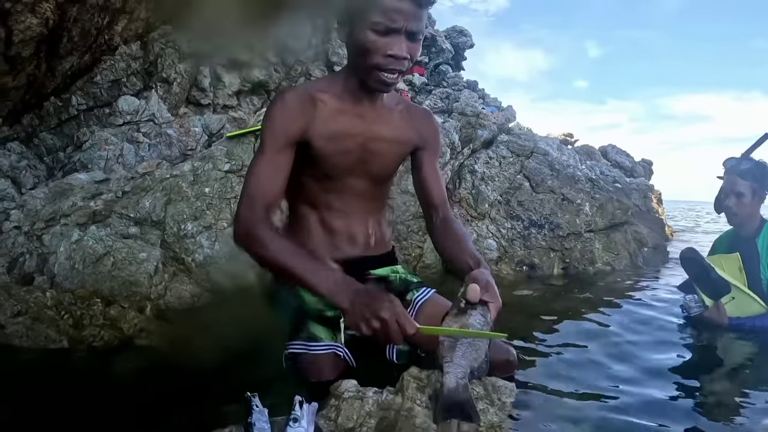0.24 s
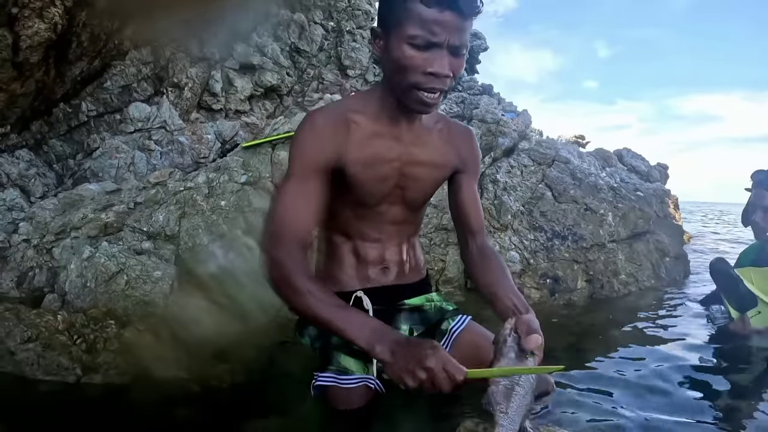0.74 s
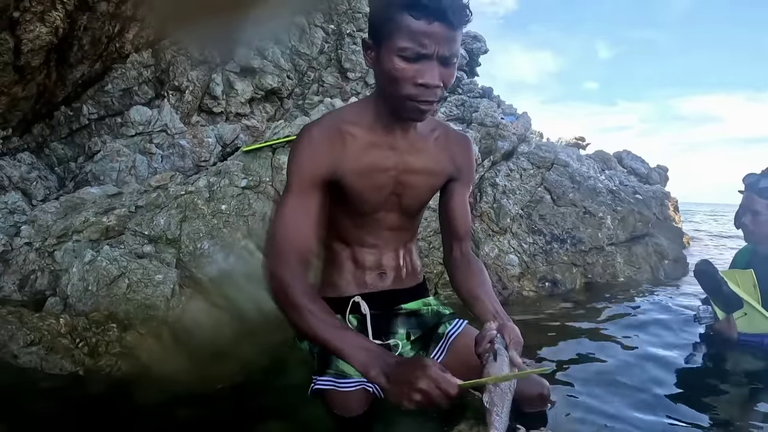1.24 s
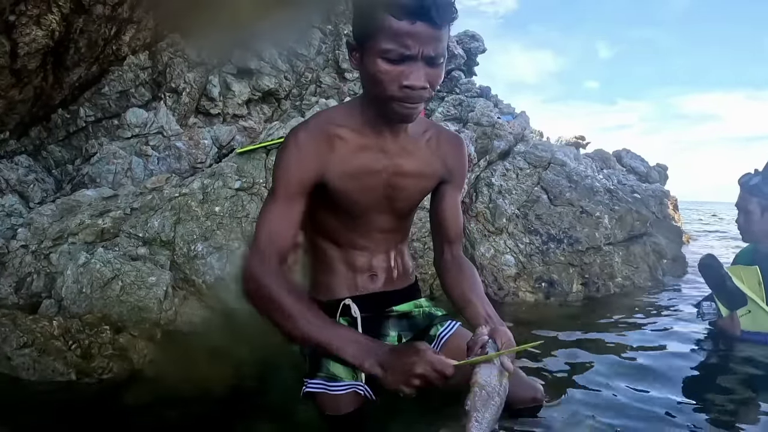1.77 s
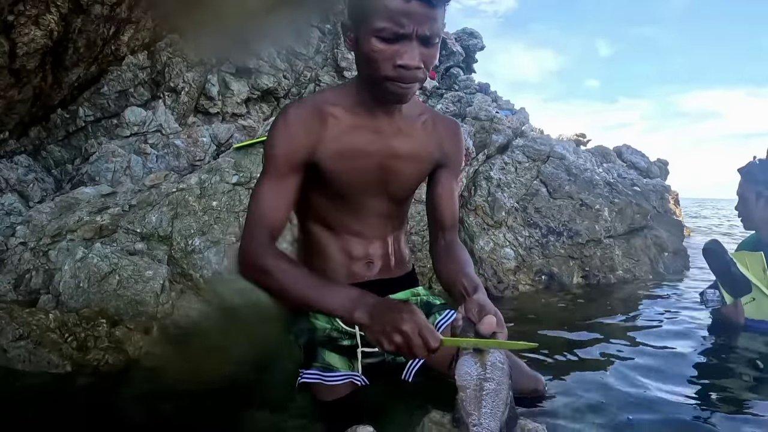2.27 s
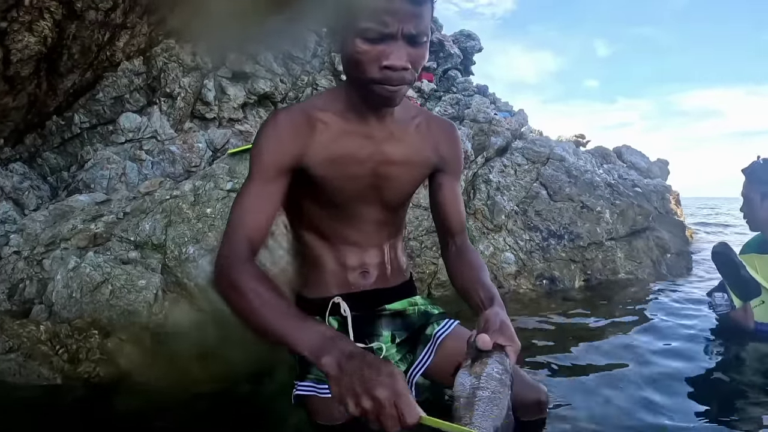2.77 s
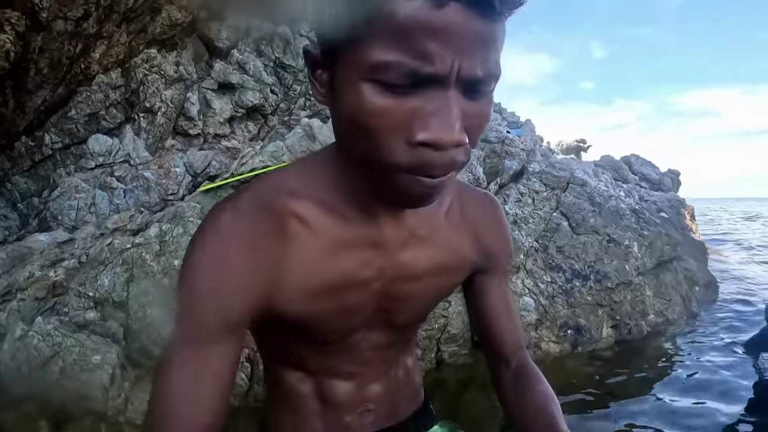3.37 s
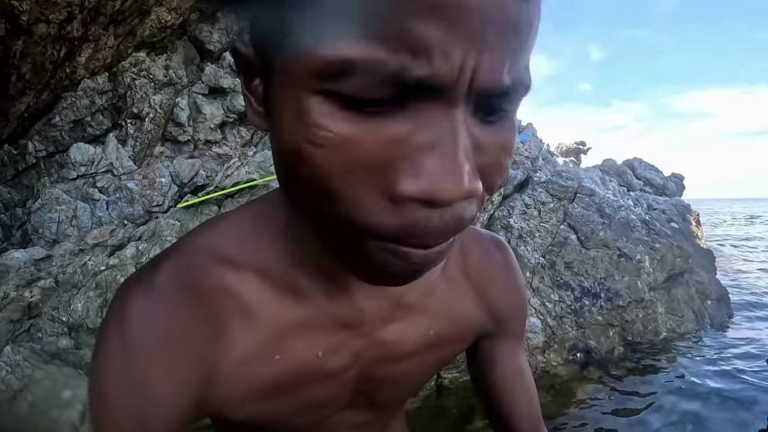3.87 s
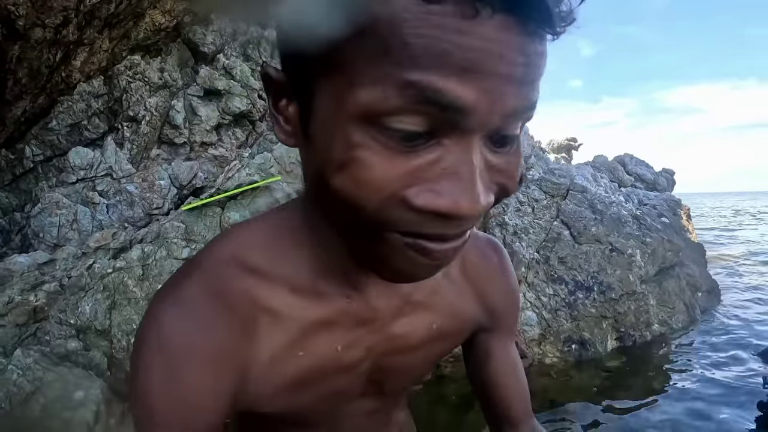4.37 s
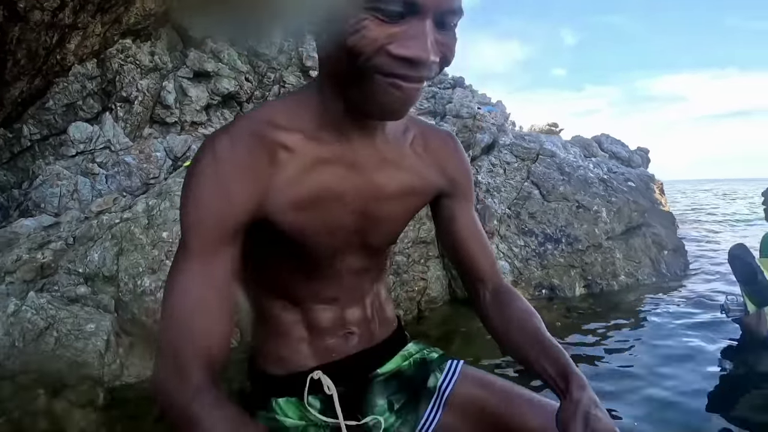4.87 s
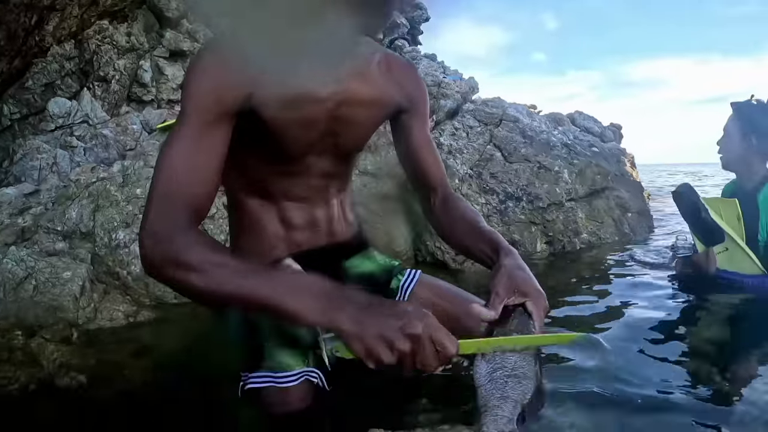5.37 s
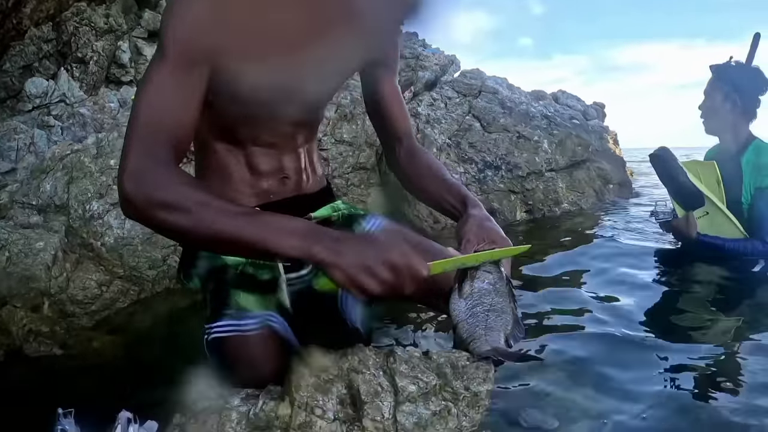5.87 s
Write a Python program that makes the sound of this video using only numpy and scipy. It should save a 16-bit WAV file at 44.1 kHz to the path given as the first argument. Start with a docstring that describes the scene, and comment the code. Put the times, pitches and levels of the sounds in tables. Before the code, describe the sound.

A wet housing is knocked and rubbed close up, air puffs past, then seawater gurgles, bubbles and laps lightly in a rock hollow.

```python
"""A low rumble and the fizz and gurgle of seawater between shore rocks open the scene.
Almost at once a wet, hollow housing is knocked and rubbed, and rings with its resonances; puffs of air follow.
Then come single bubbles, slapping wavelets, one quick wet swipe and clear plinks, over a faint hum.
Water is shaped noise and gliding sines; touch is noise through resonances, plus sines for blows and whines.
The rumble is slow noise that follows drawn level curves."""
import sys
import numpy as np
from scipy import signal
from scipy.fft import rfft, irfft, next_fast_len
from scipy.io import wavfile
from scipy.ndimage import uniform_filter1d, map_coordinates

SR = 44100
rng = np.random.default_rng(int(sys.argv[2]) if len(sys.argv) > 2 else 0)


def to_wav(sig):
    """Store sig (one row per channel, or 1-D mono) as 16-bit WAV at the path in sys.argv[1].

    Samples outside -1..1 are clipped; the rate is SR.
    """
    pcm = np.clip(np.atleast_2d(sig), -1, 1) * 32767
    pcm = np.round(pcm).astype(np.int16)
    wavfile.write(sys.argv[1], SR, pcm.T)  # frames by channels


N = 269493  # length [samples]

# Levels in event tables are set before the mix trims in the functions.
# Half-widths run from the peak to 1/e of its gain; tones are relative and are scaled to rms 1.

# Likeness of left and right, for the sea, the housing and the rumble: (frequency [Hz], likeness [0-1])
SEA_ALIKE = [(60, 0.97), (160, 1), (440, 0.71), (1170, 0.33), (3170, 0.6), (8530, 0.99)]
BODY_ALIKE = [(100, 1), (400, 0.7), (1000, 0.76), (2000, 0.14), (5000, 0.95)]
RUMBLE_ALIKE = [(25, .999), (60, .998), (130, .95), (300, .6)]

# Colour of fizzing and of gurgling water: (frequency [Hz], gain [dB])
FIZZ_TONE = [(500, -12.5), (1200, -17), (1700, -4), (1950, -5.5), (2300, -1.5), (2650, -6), (3100, 4.5),
             (3700, -9.5), (4500, -10.5), (5300, -5), (7200, -10.5), (8200, -24.5), (10000, -31)]
GURGLE_TONE = [(150, -16.5), (400, -21), (750, -24.5), (880, -15.5), (970, 0.5), (1070, -5), (1220, -24),
               (1600, -16.5), (3000, -64)]

# Surges of fizzing water along the rocks: (peak time [s], half-width [s], level [dB])
SURGES = [(.1, 0.71, -56), (1.0, 0.05, -61.5), (1.57, 0.14, -59.5), (2.15, 0.94, -65), (2.66, .06, -62),
          (3.0, 0.32, -55.5), (3.4, 0.31, -61), (3.62, 0.06, -61), (3.9, 0.26, -61.5), (4.14, 0.25, -58.5),
          (4.4, 0.22, -62), (4.73, 0.36, -58.5), (5.08, 0.081, -54.5), (5.36, 0.28, -57.5),
          (5.62, 0.047, -56), (5.95, 0.36, -57.5)]
CALM_FIZZ_DB, CALM_GURGLE_DB = -71, -68.5  # floor between surges
FIZZ_FLICKER_DB = 1.2  # quick random swell and ebb
# Small gliding bubbles: lowest pitch, range, climb as a share of pitch, level
TRICKLE_HZ, TRICKLE_OCTAVES, TRICKLE_CLIMB, TRICKLE_DB = 1266, 0.99, 0.089, -8

# Water swilling in a rock hollow: (peak time [s], half-width [s], level [dB])
GURGLES = [(.05, 0.16, -55), (1.43, 0.045, -62.5), (1.59, 0.09, -57), (1.79, 0.084, -56),
           (2.075, 0.054, -52), (2.32, .025, -57.5), (2.85, 0.05, -54.5), (3.06, 0.19, -53),
           (3.42, 0.034, -70), (3.66, 0.11, -68.5), (3.95, 0.17, -58), (4.11, 0.05, -49),
           (4.23, 0.048, -56), (4.38, 0.067, -54), (4.61, 0.072, -54), (4.77, 0.13, -57.5),
           (4.95, 0.072, -62), (5.13, 0.12, -62.5), (5.3, 0.13, -58.5), (5.51, 0.088, -56),
           (5.71, 0.032, -57), (5.83, 0.2, -58.5), (6.04, 0.058, -56.5)]
# Bubbles in the hollow: lowest pitch, range, climb as a share of pitch
GLIDE_HZ, GLIDE_OCTAVES, GLIDE_CLIMB = 801, 1.098, 0.18
GLIDE_DB, SWILL_DB = -4.5, -2  # the bubbles and the noisy swill around them

# Rumble of handling, then of moving air: (time [s], level [dB])
SWAY = [(0.0, -28.5), (0.34, -14), (0.4, -31.5), (0.75, -40.5), (0.91, -28), (1.0, -28), (1.14, -27.5),
        (1.53, -35.5), (1.81, -31.5), (1.85, -22), (2.32, -31.5), (2.45, -19.5), (2.6, -26)]
DRONE = [(2.55, -26.5), (2.9, -31), (3.36, -16), (3.41, -23), (3.59, -17), (3.66, -29), (3.69, -23),
         (4.24, -31.5), (4.59, -21.5), (4.78, -26.5), (4.95, -20), (5.12, -29), (5.22, -23.5), (6.1, -31)]
# Colour of each rumble: (frequency [Hz], gain [dB])
SWAY_TONE = [(5, -9), (11, 2.5), (18, 1), (28, -9), (45, -21.5), (80, -34), (130, -44.5), (300, -65),
             (700, -120)]
DRONE_TONE = [(10, -6), (24, 1.5), (48, 1), (60, -8.5), (80, -33.5), (110, -38.5), (230, -52), (450, -72),
              (1000, -120)]

# Blows on the housing:
# (time [s], level [dB], ring [Hz], rise [s], t60 [s], crack re level, before trim [dB])
KNOCKS = [(.122, -38, 146, .008, 0.074, -38), (0.2883, -6, 316, 0.00059, 0.016, -8.5),
          (.293, -11.5, 558, 0.00065, 0.052, -26), (.2965, -15, 942, 0.00047, .03, -24),
          (.305, -12.5, 465, 0.00038, 0.027, -15), (.311, -18, 515, 0.00039, 0.03, -21),
          (.321, -20, 2050, 0.00075, 0.024, -17.5), (0.3137, -11.5, 1375, 0.0039, 0.017, -25),
          (0.317, -6.5, 1003, 0.0021, 0.039, -27), (0.325, -12.5, 377, 0.00055, 0.023, -39.5),
          (0.3467, -7, 341, 0.0011, 0.033, -19), (0.357, -20, 1030, 0.001, 0.048, -8.5),
          (0.36, -16, 1632, 0.002, 0.031, -9.5), (.395, -19.5, 1365, 0.003, 0.022, -27),
          (0.41, -21, 1434, .0008, 0.023, -23), (0.475, -28.5, 1690, 0.0021, 0.074, -13),
          (0.502, -23.5, 2046, 0.0012, 0.026, -21), (.512, -25, 1720, 0.0009, 0.0245, -13),
          (.522, -28, 624, .001, 0.03, -13), (0.528, -21.5, 1470, 0.0019, 0.014, -12.5),
          (.551, -27.5, 1420, 0.0012, .02, -18), (.561, -23, 1540, .001, .02, -15),
          (.668, -35, 2250, 0.0015, 0.019, 1.5), (.815, -25, 1020, 0.0017, .04, -23),
          (.85, -23, 944, .001, 0.053, -23), (.879, -16, 1015, 0.00075, 0.029, -16),
          (.889, -15, 324, 0.00044, 0.0064, -30), (.89, -19, 1506, 0.0012, 0.024, -23),
          (.948, -28, 1010, 0.0028, .1, -31), (1.057, -35.5, 1002, .001, .06, -20),
          (1.274, -32, 910, 0.00075, 0.011, -51), (1.276, -25.5, 436, 0.0012, 0.02, -39),
          (2.248, -28.5, 380, 0.00091, .035, -54), (2.515, -26.5, 1056, 0.0054, 0.047, -24),
          (2.578, -27.5, 378, 0.017, 0.067, -15.5), (2.591, -33, 1320, 0.0077, 0.038, -26),
          (3.254, -44.5, 553, 0.0012, 0.019, -27), (3.426, -44.5, 468, .0015, 0.011, -22),
          (4.415, -49, 595, 0.0014, 0.027, -25)]
# Resonances of the housing: (frequency [Hz], width [Hz], gain [dB])
HOUSING = [(382, 93, -0.5), (629, 71, -0.5), (990, 98, 1), (1560, 131, -4), (2084, 56, -8.5),
           (2600, 680, -22), (3670, 240, -23.5), (5340, 970, -29.5), (7110, 2300, -35)]
# The housing favours one side: (frequency [Hz], left minus right [dB])
SHELL_TILT = [(60, 1), (120, 0.5), (250, -0.5), (500, -4), (1020, 1), (2070, 1), (4200, -1.5), (8530, 0)]
# The lower the ring, the heavier the thump (level re the blow)
THUMP_DB, THUMP_DB_PER_OCTAVE, THUMP_REF_HZ = 2, -4, 348
PORT_SKEW = 0.36  # the shell moves the two ports out of step: phase lead and lag [rad]
CLATTER_BRIGHTENS = 0.32  # dB of upper clatter for each dB of crack: soft blows sound dull

# Strokes of skin over the housing: (start [s], length [s], level [dB], hiss re level, before trim [dB])
RUBS = [(0.209, 0.17, -46, -8), (0.373, 0.059, -44, -12), (0.434, 0.035, -38.5, -5), (0.465, 0.4, -34, -9),
        (0.498, .07, -36.5, -11.5), (.812, .02, -39, -17), (0.846, 0.045, -26, -17),
        (0.92, 0.015, -34, -20.5), (0.938, 0.059, -42.5, -21.5), (1.049, 0.092, -41.5, -17.5),
        (1.105, 0.025, -45, -29), (1.153, 0.061, -54.5, -17)]
RUB_ATTACK_S, RUB_T60_S, RUB_SAG_DB_PER_S = 0.019, 0.057, 8.5
FASTEST_AT, SPEED_WIDTH = 0.23, 0.49  # when the skin slides fastest and how broadly, in stroke lengths
HISS_SPEED_DB = 6.5  # extra hiss from slowest to fastest sliding
SOFT_BOOM = 0.44  # dB of extra low ring for each dB less hiss: soft skin booms, firm skin hisses
RUB_ROUGH_DB, RUB_ROUGH_PER_S, RUB_PATCHY_DB = 2.1, 280, 1.8  # stick and slip, its rate, drifts of colour
# Tiny bubbles bursting under the skin: level on the hiss envelope, lowest pitch, range
SQUELCH_DB, SQUELCH_HZ, SQUELCH_OCTAVES = 2.5, 800, 1.6
# The housing under a light touch: (frequency [Hz], width [Hz], gain [dB])
HOLLOW = [(383, 29, 3), (597, 36, -14), (1028, 40, 0.5), (1480, 50, -10)]
HOLLOW_DB, HOLLOW_DAMPING = -29, 0.98  # ring at 0 dB hiss; dB less for each dB more hiss, as firm skin damps it

# The housing sings as skin or air passes:
# (peak time [s], half-width [s], level [dB], pitch at peak [Hz], glide [Hz/s])
WHINES = [(.233, .026, -41.5, 660, 500), (.25, 0.019, -38.5, 987, 700), (0.235, 0.029, -44.5, 1805, 1798),
          (1.125, .022, -33.5, 393, -200), (1.888, 0.032, -32.5, 387.4, 200),
          (1.935, 0.047, -30.5, 572, 252), (1.935, 0.063, -40, 988, -400), (1.97, 0.068, -28.5, 164.3, -29),
          (2.015, .02, -43.5, 975, -1500), (2.538, 0.012, -26.5, 1427, 900), (2.54, 0.011, -33, 2140, 598),
          (2.54, .013, -40, 2900, 600), (2.54, 0.016, -37, 2642, 597)]
WHINE_WAVER_DB = 1.5  # uneven contact

# Squeak of wet skin as it starts to slide; resonances: (frequency [Hz], width [Hz], gain [dB])
SQUEAK_RING = [(675, 87, -8), (1400, 82, -0.5), (1700, 79, -6), (2060, 46, -9)]
SQUEAK_S, SQUEAK_LENGTH_S, SQUEAK_DB = 0.374, 0.08, -32.5

# Puffs of air on the ports: (peak time [s], half-width [s], buffet level [dB], rush level [dB])
PUFFS = [(.82, 0.015, -26.5, -60), (0.897, 0.0099, -18, -44), (1.82, 0.038, -44, -55),
         (1.866, 0.014, -24, -37.5), (1.93, 0.055, -31.5, -29), (2.005, 0.038, -30.5, -46),
         (2.125, 0.024, -42, -55.5), (2.199, 0.058, -36.5, -51), (3.199, 0.14, -37.5, -59)]
# Resonances of the port hollows: (frequency [Hz], width [Hz], gain [dB])
PORT = [(164.6, 17, 1.5), (425, 131, -3.5), (624, 66, -3), (942, 74, -6.5), (1315, 314, -13.5),
        (2540, 395, -21.5), (5530, 9500, -53)]
# Colour of the buffets: (frequency [Hz], gain [dB])
BUFFET_TONE = [(20, -26), (45, 7), (70, -2.5), (100, -13.5), (160, -26), (400, -94)]
BUFFET_WIDTH, FLUTTER_WIDTH = 0.94, 0.94  # shares of the rush's width: slightly shorter than the rush
FLUTTER_LAG_S = 0.016  # the flutter peaks after the rush
FLUTTER_TOWARD_RUSH = 0.77  # flutter level lies this share of the way from buffet to rush, in dB

# Single bubbles: (mid-swell time [s], level [dB], pitch [Hz], climb [share of pitch])
BUBBLES = [(1.02, -37, 2960, 0.093), (2.322, -42, 1060, 0.35), (2.685, -41, 3090, 0.064),
           (2.78, -39, 940, 0.12), (2.815, -41, 958, 0.18), (2.862, -34.5, 1000, 0.3),
           (2.895, -35, 2930, 0.1), (2.98, -41, 1720, .15), (2.995, -29.5, 998, 0.61),
           (3.122, -45, 1250, 0.22), (3.152, -40, 3040, .1), (3.235, -36, 2450, 0.19),
           (3.538, -49, 816, 0.68), (3.56, -36, 970, 0.76), (4.08, -33, 1050, 0.75),
           (4.126, -39.5, 956, 0.53), (4.134, -42, 1900, 0.17), (4.204, -37.5, 2630, .2),
           (4.413, -42, 945, 0.38), (4.442, -32.5, 985, 0.18), (4.577, -35, 934, 0.23),
           (4.655, -53, 776, 0.38), (4.695, -45, 1130, 0.19), (4.81, -38.5, 2600, .2),
           (5.148, -27, 2950, 0.07), (5.162, -40.5, 1380, 0.21), (5.25, -39, 2780, .1),
           (5.392, -31, 5650, 0.17), (5.422, -42, 1070, 0.14), (5.504, -36.5, 1007, 0.17),
           (5.541, -45, 1160, .25), (5.68, -38.5, 1013, 0.097), (6.059, -41.5, 933, 0.16)]
BUBBLE_RISE_CYCLES = 10.97  # a bubble swells for this many cycles before its peak
BUBBLE_FLUTTER_DB = 1.6  # moving water makes the ring uneven

# Thin sheets of water hissing off the rock: (peak time [s], half-width [s], level [dB])
DRAINS = [(1.109, 0.066, -56), (1.46, 0.022, -63.5), (2.979, 0.015, -69), (3.1, 0.065, -60),
          (3.86, 0.031, -60), (4.1, 0.015, -63), (4.36, 0.036, -57.5), (4.61, 0.015, -52.5),
          (5.382, 0.033, -62), (5.9, 0.021, -54.5)]
# Wavelets slapping the rock:
# (time [s], level [dB], t60 [s], trapped air pitch [Hz], ring re level [dB], low plop re level [dB])
SLAPS = [(1.5566, -32, 0.18, 3150, -5.5, -28), (2.442, -37.5, 0.061, 2190, -9, -35),
         (3.338, -25.5, 0.092, 1580, -8.5, -15), (3.7189, -36, 0.17, 1630, -2.5, -38.5),
         (4.065, -35.5, 0.22, 2220, -14, -19), (4.869, -28.5, 0.078, 1670, -9, -18),
         (5.1462, -32, 0.036, 3040, -8, -18.5), (5.3017, -36.5, 0.21, 2320, -5, -20),
         (5.336, -29.5, 0.085, 2360, -6.5, -26), (5.366, -43.5, 0.044, 2330, 3, -32),
         (5.611, -36, 0.12, 2370, -5.5, -33), (5.947, -32.5, 0.082, 2030, -6.5, -40)]
# Colour of the slaps and of their spray: (frequency [Hz], gain [dB])
SLAP_TONE = [(200, -13.5), (700, -20.5), (1000, 11), (1350, -10.5), (1700, 5), (2400, 1.5), (3100, 6),
             (3900, -17), (6000, -25.5)]
SPRAY_TONE = [(2000, -20.5), (4000, -5.5), (5200, 5), (7200, 0.5), (8500, -30.5), (11000, -36)]
SLAP_RISE_S, SLAP_RING_CYCLES = 0.0045, 39  # attack; life of the trapped air's ring
SLAP_TICK_DB, SLAP_SPRAY_DB = -22, -20  # first contact and spray re the burst, before trims

# Resonances in the swipe: (frequency [Hz], width [Hz], gain [dB])
SWIPE_RING = [(399, 92, -2.5), (1010, 79, 1.5), (1226, 104, -1), (1424, 68, 2.5), (1673, 63, 1),
              (2147, 53, 2), (2600, 43, -1), (2900, 160, -7), (5200, 1470, -19.5), (6720, 1040, -20)]
SWIPE_S, SWIPE_WIDTH_S, SWIPE_DB = 2.538, 0.014, -24  # peak time, half-width, level
GRAZE_WIDER, GRAZE_DB = 3.46, -16.5  # lighter touch around the swipe: width and level against it

# Air pockets snapped shut by a slap: (time [s], level [dB], pitch [Hz], t60 [s])
PLINKS = [(3.341, -37, 1060, 0.052), (3.342, -42, 2277, 0.039), (3.345, -40.5, 2867, 0.045),
          (4.868, -38, 977, 0.053), (4.87, -39, 4800, 0.032), (4.869, -46, 4210, 0.06),
          (4.869, -42, 2930, 0.053), (5.338, -39.5, 3000, .05), (5.338, -49, 5020, .05),
          (5.613, -45.5, 2240, .06), (5.632, -42.5, 2390, 0.049), (5.948, -51, 4650, .04)]
PLINK_RISE_S, PLINK_CLIMB = 0.0025, 0.02  # attack; climb as a share of pitch

# Narrow hum resonances, applied twice: (frequency [Hz], width [Hz], gain [dB])
HUM_LINES = [(118, 20, -5), (168.3, 8.9, -2), (232.6, 5.4, -0.5), (290, 36, -6.5)]
HUM_PEAK_S, HUM_DB, HUM_FADE_DB_PER_S = 4.35, -63, 7.5

TOP_HZ = 9130  # corner of the final low-pass


def amp(db):
    """Decibels to gain."""
    return 10 ** (np.asarray(db) / 20)


def unit(x):
    """Scale to rms 1."""
    return x / np.sqrt(np.mean(x ** 2) + 1e-20)


def noise_pair():
    """Two unrelated channels of white noise."""
    return rng.standard_normal((2, N))


def along(points, hz):
    """(frequency, value) points read on a log frequency axis."""
    f, value = np.transpose(points)
    return np.interp(np.log(hz + 1), np.log(f + 1), value)


def gains(rows, fade):
    """Gain per sample along (time, level) rows, fading out beyond them."""
    s, db = np.transpose(rows)
    t = np.arange(N) / SR
    edges = np.interp(t, [s[0] - fade, s[0], s[-1], s[-1] + fade], [0, 1, 1, 0])
    return edges * amp(np.interp(t, s, db))


def wobble(rate):
    """A smooth random curve, rate knots a second."""
    knots = rng.standard_normal(int(N * rate / SR) + 4)
    return map_coordinates(knots, [np.arange(N) * rate / SR])


def filtered(x, response):
    """x times a response of frequency."""
    size = next_fast_len(N + SR // 2)
    spectrum = rfft(x, size) * response(np.fft.rfftfreq(size, 1 / SR))
    return irfft(spectrum, size)[..., :N]


def coloured(x, tone):
    """x filtered by a tone table, at rms 1."""
    return unit(filtered(x, lambda hz: amp(along(tone, hz))))


def resonate(x, modes):
    """x through parallel resonances of alternating sign."""
    def response(f):
        total = 0
        for k, (centre, width, db) in enumerate(modes):
            damping = 1j * f * width
            total = total + (-1) ** k * amp(db) * damping / (centre * centre - f * f + damping)
        return total
    return filtered(x, response)


def band(x, lo_hz, hi_hz, order=10):
    """One band of x, at rms 1."""
    def response(f):
        low_edge = 1 + (lo_hz / (f + 1)) ** order
        high_edge = 1 + (f / hi_hz) ** order
        return 1 / np.sqrt(low_edge * high_edge)
    return unit(filtered(x, response))


def spread(pair, alike):
    """Two unrelated signals become left and right with the given likeness."""
    def response(hz):
        turn = np.arccos(np.clip(along(alike, hz), -1, 1)) / 2
        return np.array([np.cos(turn), np.sin(turn)])
    mid, side = filtered(pair, response)
    return np.array([mid + side, mid - side])


def grit(rate, scatter_db, smooth):
    """Two channels of tiny random impulses over a share of smooth noise."""
    hits = rng.random((2, N)) < rate / SR
    sizes = rng.choice([-1, 1], (2, N)) * amp(scatter_db * np.minimum(noise_pair(), 2))
    return unit(hits * sizes) + smooth * noise_pair()


def patchy(x, depth_db):
    """Drifting patches of random gain over time and pitch."""
    z = signal.stft(x, nperseg=512)[2]
    field = rng.standard_normal(z.shape[1:])
    for axis in (0, 1):
        field = uniform_filter1d(field, size=5, axis=axis)
    return signal.istft(z * amp(depth_db * unit(field)), nperseg=512)[1][:, :N]


def add(track, s, sound):
    """Mix a sound into a track at time s, or at the start if s is negative."""
    start = max(round(s * SR), 0)
    room = track[..., start:start + sound.shape[-1]]
    room += sound[..., :room.shape[-1]]


def swell(t, rise, t60):
    """A rounded rise to 1, then an exponential decay."""
    attack = np.sin(np.pi / 2 * np.minimum(t / rise, 1)) ** 2
    return attack * amp(-60 * np.maximum(t - rise, 0) / t60)


def bell(s, width):
    """A smooth rise to 1 at time s and an equal fall."""
    return np.exp(-((np.arange(N) / SR - s) / width) ** 2)


def stroke(s, length):
    """Pressure of one stroke: attack, a slowly sagging hold, release."""
    t = np.maximum(np.arange(N) / SR - s, 0)
    release_db = 60 * np.maximum(t - length, 0) / RUB_T60_S
    return np.minimum(t / RUB_ATTACK_S, 1) * amp(-RUB_SAG_DB_PER_S * t - release_db)


def bubble(hz, cycles, climb, rise):
    """A bubble rings for some cycles and climbs in pitch as it nears the surface."""
    t = np.arange(SR // 12) / SR
    life = cycles / hz
    bent_time = t + climb * t * (t / life / 2 - 1 / 4)
    return swell(t, rise, life) * np.sin(2 * np.pi * hz * bent_time)


def bubbling(count, low_hz, octaves, cycles, climb, rise, range_db):
    """A stereo stream of bubbles at random moments, pitches and places, at rms 1."""
    out = np.zeros((2, N))
    for when, pitch, size, place in rng.random(size=(count, 4)):
        ring = bubble(low_hz * 2 ** (octaves * pitch), cycles, climb, rise)
        pan = amp(np.array([4, -4]) * (place - 0.5))
        add(out, when * N / SR, np.outer(pan, ring) * amp(-range_db * size))
    return unit(out)


def surging(rows, calm_db):
    """Gain of water that swells at each row and calms between them; powers add."""
    power = sum((amp(db) * bell(s, width)) ** 2 for s, width, db in rows)
    return np.sqrt(amp(calm_db) ** 2 + power)


def wash():
    """The open sea keeps up a faint wash behind the rocks; it wanders in level."""
    sea = spread(noise_pair(), SEA_ALIKE) * amp(1.5 * wobble(9))
    return amp(-68) * coloured(sea, FIZZ_TONE) + amp(-76) * coloured(sea, GURGLE_TONE)


def lapping():
    """Small bubbles fizz, trickle and burst along the water's edge."""
    foam = spread(grit(rate=800, scatter_db=5.5, smooth=0.95), SEA_ALIKE)
    foam = patchy(foam * amp(3.1 * wobble(58)), depth_db=4)
    beads = bubbling(count=3000, low_hz=1448, octaves=2.5, cycles=32, climb=0.055, rise=0.001, range_db=25.5)
    spray = unit(coloured(foam, FIZZ_TONE) + amp(-8) * coloured(beads, FIZZ_TONE))
    spray = spray * amp(FIZZ_FLICKER_DB * wobble(10))
    trickle = bubbling(count=760, low_hz=TRICKLE_HZ, octaves=TRICKLE_OCTAVES, cycles=54,
                       climb=TRICKLE_CLIMB, rise=0.0051, range_db=20)
    return surging(SURGES, CALM_FIZZ_DB) * (amp(1.07) * spray + amp(TRICKLE_DB) * trickle)


def gurgling():
    """Water swills in a rock hollow; overlapping bubbles glide up through its resonance."""
    swill = patchy(spread(grit(rate=200, scatter_db=5.5, smooth=0.41), SEA_ALIKE), depth_db=2)
    glides = bubbling(count=420, low_hz=GLIDE_HZ, octaves=GLIDE_OCTAVES, cycles=48,
                      climb=GLIDE_CLIMB, rise=0.008, range_db=10)
    glides = unit(coloured(glides, GURGLE_TONE) + amp(-19) * glides)
    water = amp(SWILL_DB) * coloured(swill, GURGLE_TONE) + amp(GLIDE_DB) * glides
    return surging(GURGLES, CALM_GURGLE_DB) * water


def rumble():
    """Slow pressure swings of handling and moving air, nearly the same in both channels."""
    out = np.zeros((2, N))
    for rows, tone in ((SWAY, SWAY_TONE), (DRONE, DRONE_TONE)):
        swing = coloured(spread(noise_pair(), RUMBLE_ALIKE), tone)
        # Divide by the local rms so that the level curve alone shapes the loudness
        power = uniform_filter1d(uniform_filter1d(swing[0] ** 2, size=5000), size=3000)
        level = uniform_filter1d(gains(rows, fade=0.19), size=1300)
        out += level * swing / np.sqrt(np.abs(power))
    return out


def knocks():
    """Each blow rings one resonance of the housing, with a wet crack, a clatter of the shell and a low thump."""
    t = np.arange(SR // 5) / SR
    rings = np.zeros((2, N))
    cracks, clatter, bright = np.zeros((3, N))
    skew = PORT_SKEW * np.array([[1], [-1]])
    for s, db, hz, rise, t60, crack_db in KNOCKS:
        thump_db = THUMP_DB + THUMP_DB_PER_OCTAVE * np.log2(hz / THUMP_REF_HZ)
        blow = amp(db) * swell(t, rise, t60)
        thump = amp(db + thump_db) * swell(t, 0.0041, 0.029) * np.sin(2 * np.pi * 75 * t)
        add(rings, s, -blow * np.sin(2 * np.pi * hz * t + skew) - thump)
        add(cracks, s, amp(db + crack_db) * swell(t, rise, 0.017))
        add(clatter, s, blow)
        add(bright, s, blow * amp(CLATTER_BRIGHTENS * crack_db))
    noise = spread(noise_pair(), BODY_ALIKE)
    shell = unit(resonate(spread(noise_pair(), BODY_ALIKE), HOUSING))
    crack_noise = amp(-7.5) * cracks * band(noise, 918, 6480)
    low_clatter = amp(-14) * clatter * band(shell, 180, 750)
    high_clatter = amp(-6.5) * bright * band(shell, 990, 3600)
    return rings + crack_noise + low_clatter + high_clatter


def rubs():
    """Skin slips in tiny catches that excite the wet housing; it hisses most where it slides fastest."""
    press, boom, hiss, hollow = np.zeros((4, N))
    for s, length, db, hiss_db in RUBS:
        pressure = amp(db) * stroke(s, length)
        speed = bell(s + FASTEST_AT * length, SPEED_WIDTH * length)
        press += pressure
        hollow += pressure * amp(min(HOLLOW_DB - HOLLOW_DAMPING * hiss_db, 2))
        boom += pressure * amp(-SOFT_BOOM * hiss_db)
        hiss += pressure * amp(hiss_db - HISS_SPEED_DB * (1.5 - speed))
    catches = grit(rate=1700, scatter_db=0, smooth=0.7) * amp(RUB_ROUGH_DB * wobble(RUB_ROUGH_PER_S))
    slips = spread(patchy(catches, depth_db=RUB_PATCHY_DB), BODY_ALIKE)
    shell = resonate(slips, HOUSING)
    squelch = bubbling(count=900, low_hz=SQUELCH_HZ, octaves=SQUELCH_OCTAVES, cycles=18,
                       climb=0.05, rise=0.0002, range_db=26)
    low = amp(-10) * band(shell, 170, 900) + amp(-16.5) * band(shell, 60, 109)
    middle = amp(-1.5) * band(shell, 800, 1480)
    high = amp(7) * band(shell, 1920, 8900) + amp(SQUELCH_DB) * squelch
    ring = band(resonate(slips, HOLLOW), 300, 1700)
    return boom * low + press * middle + hiss * high + hollow * ring


def whines():
    """Single resonances of the housing swell into short gliding tones."""
    out = np.zeros(N)
    for s, width, db, hz, glide in WHINES:
        t = np.arange(N) / SR - s
        turns = hz * t + glide * t ** 2 / 2 + rng.random()
        out += amp(db) * bell(s, width) * np.sin(2 * np.pi * turns)
    return out * amp(WHINE_WAVER_DB * wobble(120))


def squeak():
    """Wet skin catches on the housing with a thin, grainy squeak."""
    catches = spread(grit(rate=900, scatter_db=-1, smooth=0.54), BODY_ALIKE)
    return amp(SQUEAK_DB) * stroke(SQUEAK_S, SQUEAK_LENGTH_S) * unit(resonate(catches, SQUEAK_RING))


def puffs():
    """Air buffets the microphone ports, flutters in them and sounds their hollows."""
    buffet, flutter, rush = np.zeros((3, N))
    for s, width, buffet_db, rush_db in PUFFS:
        flutter_db = buffet_db + FLUTTER_TOWARD_RUSH * (rush_db - buffet_db)
        buffet += amp(buffet_db) * bell(s, BUFFET_WIDTH * width)
        flutter += amp(flutter_db) * bell(s + FLUTTER_LAG_S, FLUTTER_WIDTH * width)
        rush += amp(rush_db) * bell(s, width)
    eddies = spread(noise_pair() * amp(2.55 * wobble(110)), BODY_ALIKE)
    port = resonate(eddies, PORT)
    push = amp(1) * buffet * coloured(eddies, BUFFET_TONE)
    return push + amp(-3) * flutter * band(port, 105, 215) + amp(2.5) * rush * band(port, 333, 7500)


def bubbles():
    """Larger bubbles swell as their pitch climbs; two quieter ones ring near each in time and pitch."""
    out = np.zeros(N)
    for s, db, hz, climb in BUBBLES:
        rise = BUBBLE_RISE_CYCLES / hz
        add(out, s - rise / 2, amp(db - 7.5) * bubble(hz, cycles=43, climb=climb, rise=rise))
        for delay, pitch in rng.standard_normal((2, 2)):
            small = bubble(hz * np.exp(0.08 * pitch), cycles=39, climb=climb, rise=0.0046)
            add(out, s + 0.023 * delay, amp(db - 17) * small)
    return out * amp(BUBBLE_FLUTTER_DB * wobble(160))


def slaps():
    """Wavelets hit the rock with a tick, a burst and a low plop; trapped air rings, and spray and drains hiss."""
    t = np.arange(SR // 4) / SR
    body, plop, pockets = np.zeros((3, N))
    mist = sum(amp(db) * bell(s, width) for s, width, db in DRAINS)
    for s, db, t60, hz, ring_db, plop_db in SLAPS:
        tick = amp(SLAP_TICK_DB) * swell(t, 0.0004, 0.009)
        burst = amp(db) * (swell(t, SLAP_RISE_S, t60) + tick)
        add(body, s, burst)
        add(mist, s, burst * amp(SLAP_SPRAY_DB))
        add(plop, s, burst * amp(plop_db))
        pocket = bubble(hz, cycles=SLAP_RING_CYCLES, climb=0.05, rise=0.0011)
        add(pockets, s, amp(db + ring_db) * pocket)
        for delay, pitch in rng.random(size=(5, 2)):
            small_hz = hz * 2 ** (1.3 * pitch - 0.2)
            small = bubble(small_hz, cycles=SLAP_RING_CYCLES, climb=0.089, rise=0.00031)
            add(pockets, s + 0.011 * delay, amp(db + ring_db - 7.5) * small)
    drops = spread(grit(rate=2600, scatter_db=4, smooth=0.16), SEA_ALIKE)
    splash = amp(-14) * body * coloured(drops, SLAP_TONE)
    spray = mist * coloured(drops, SPRAY_TONE)
    return pockets + splash + spray + amp(-7) * plop * band(drops, 170, 700)


def swipe():
    """A finger squeezes a film of water off the housing in one bright rasp."""
    rasp = spread(grit(rate=2200, scatter_db=-1, smooth=0.88), BODY_ALIKE)
    graze = amp(GRAZE_DB) * bell(SWIPE_S, GRAZE_WIDER * SWIPE_WIDTH_S)
    pressure = bell(SWIPE_S, SWIPE_WIDTH_S) + graze
    return amp(SWIPE_DB) * pressure * unit(resonate(rasp, SWIPE_RING))


def plinks():
    """Pockets of air pinched off against the rock ring quickly and clearly."""
    out = np.zeros(N)
    for s, db, hz, t60 in PLINKS:
        add(out, s, amp(db) * bubble(hz, cycles=hz * t60, climb=PLINK_CLIMB, rise=PLINK_RISE_S))
    return out


def hum():
    """Narrow low lines of resonant noise waver under the water, rising to one peak and fading again."""
    distance = np.abs(np.arange(N) / SR - HUM_PEAK_S)
    lines = resonate(resonate(rng.standard_normal(N), HUM_LINES), HUM_LINES)
    return amp(HUM_DB - HUM_FADE_DB_PER_S * distance) * unit(lines)


def scene():
    """The sea all around, the handling noises right at the microphone."""
    sea = wash() + lapping() + gurgling() + bubbles() + slaps() + plinks()
    touch = knocks() + rubs() + whines() + squeak() + puffs() + swipe()
    touch = filtered(touch, lambda hz: amp(np.outer([0.5, -0.5], along(SHELL_TILT, hz))))
    return sea + touch + rumble() + hum()


def record(dry):
    """Round off the highest peaks and low-pass steeply at TOP_HZ."""
    held = dry / (1 + np.abs(dry / 0.9) ** 8) ** (1 / 8)
    return filtered(held, lambda hz: 1 / np.sqrt(1 + (hz / TOP_HZ) ** 40))


dry = scene()
out = record(dry)
to_wav(out)
```